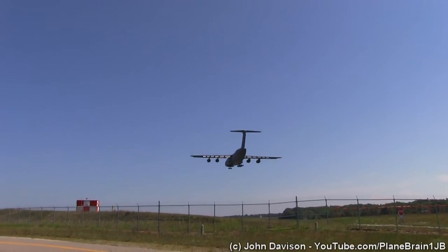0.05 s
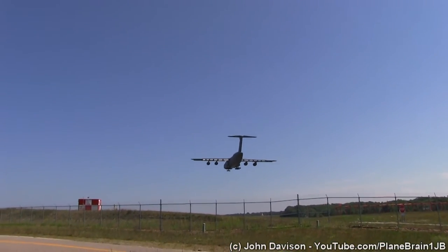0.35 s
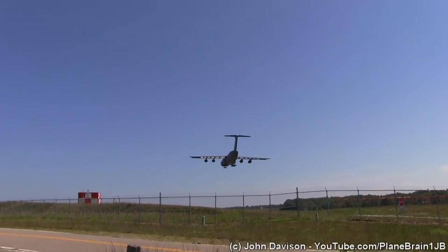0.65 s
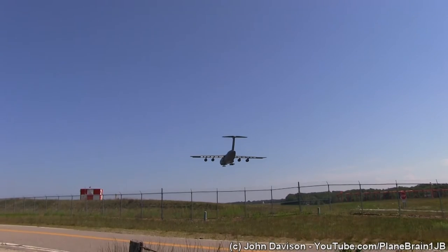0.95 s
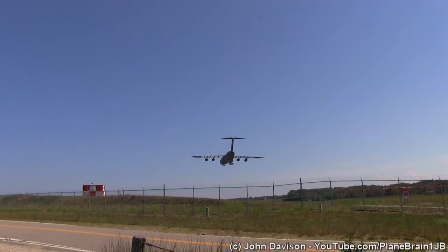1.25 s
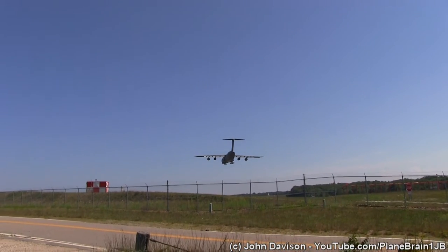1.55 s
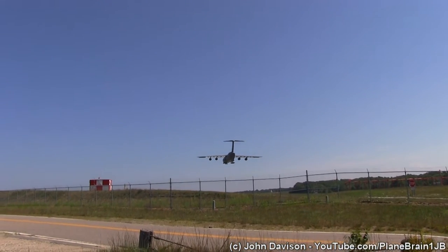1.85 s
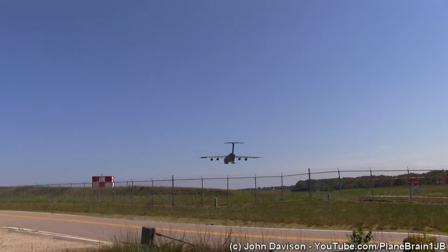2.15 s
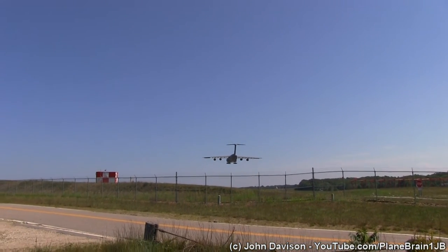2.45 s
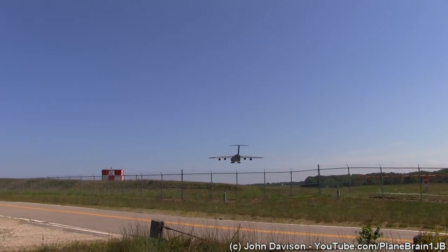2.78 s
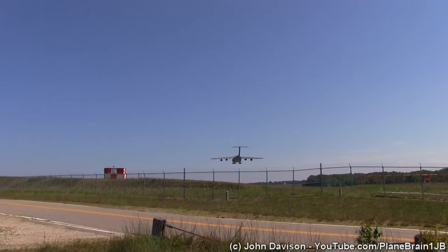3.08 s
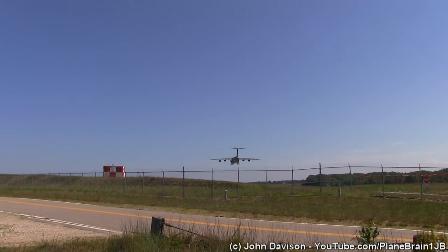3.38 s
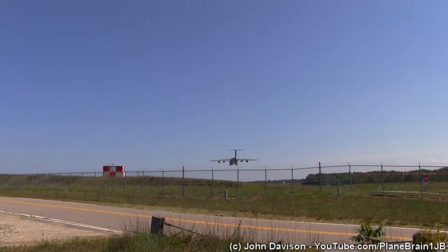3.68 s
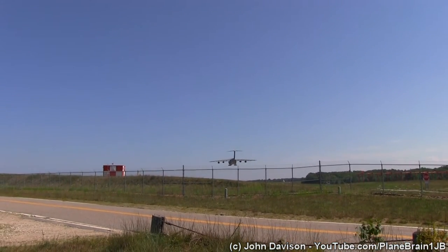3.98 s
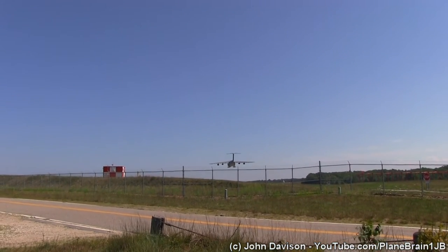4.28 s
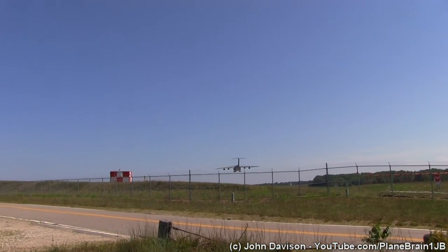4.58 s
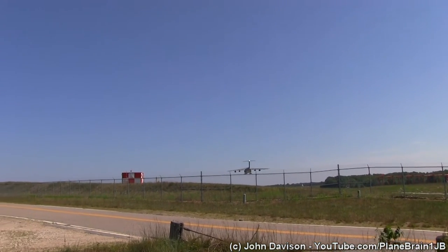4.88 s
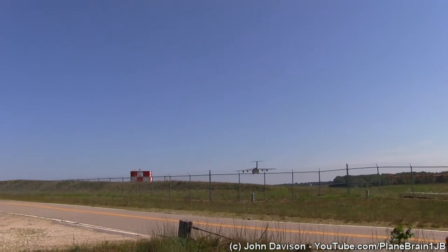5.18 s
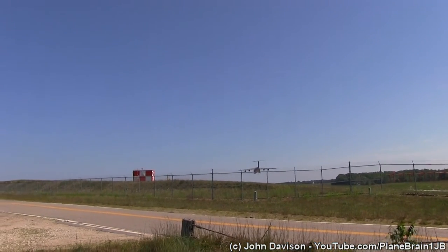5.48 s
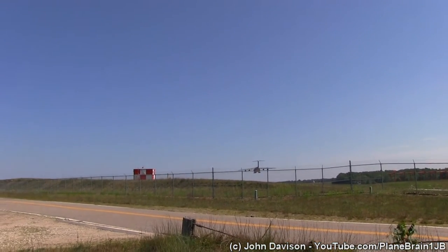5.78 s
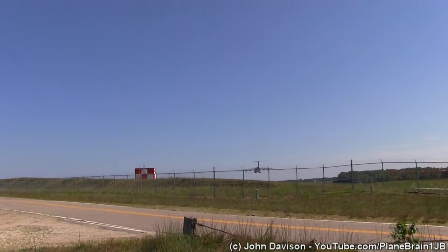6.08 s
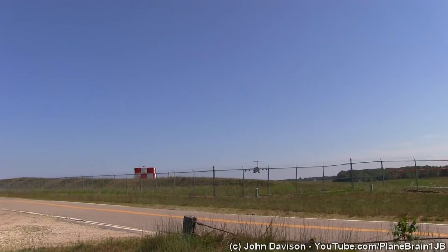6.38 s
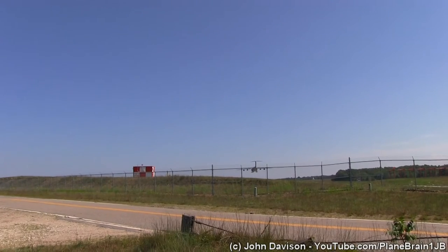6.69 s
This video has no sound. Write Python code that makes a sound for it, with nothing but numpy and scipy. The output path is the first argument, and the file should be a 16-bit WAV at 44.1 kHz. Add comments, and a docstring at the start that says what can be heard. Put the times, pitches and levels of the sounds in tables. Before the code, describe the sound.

A large four-engined jet has just passed low overhead and flies away to land. Its high fan whine wavers and sinks very slightly in pitch over a broad hiss and deep exhaust roar, all growing steadily quieter and duller. Outdoors near a runway, wind hits the microphone with low rumbles and thumps, hardest in the first second, easing off, then returning more gently in the second half.

```python
"""Near an airport runway, a four-engined jet has just passed low overhead and sinks away to land.
Its fans whine, each tone smeared into a narrow band by churning air, over fan hiss and exhaust roar.
As the distance grows, the jet gets quieter and the air takes its treble away.
Gusts of wind rumble and thump on the microphone; the first ones make a limiter turn everything down."""
import sys
import numpy as np
from scipy import signal
from scipy.fft import rfft, irfft, next_fast_len
from scipy.io import wavfile
from scipy.ndimage import uniform_filter1d

SR = 44100
rng = np.random.default_rng(int(sys.argv[2]) if len(sys.argv) > 2 else 0)


def persist_wave(psi):
    """Save psi, clipped to +-1, as 16-bit WAV."""
    counts = np.round(np.clip(psi, -1, 1) * 32767).astype(np.int16)
    wavfile.write(sys.argv[1], SR, np.atleast_2d(counts).T)


N = 306044
TIME = np.arange(N) / SR

# how often fan blades pass, as heard; the Doppler shift lowers it a little (time [s], rate [Hz])
BLADE_PITCH = [(0, 1344), (1.1, 1338), (3.4, 1323), (6.94, 1309)]
# the main whine and its upper fringe (pitch [times the blade rate], width [Hz], level [dB])
MAIN_WHINE = [(.974, 47, -6), (1.006, 67, -3.5), (1.044, 90, -10), (1.03, 313, -13)]
# the lower engine tones (pitch [times the blade rate], width [Hz], level [dB])
LOW_WHINE = [(.622, 38.4, -1.5), (.558, 36, -11)]
# the fans' overtones and side bands (pitch [times the blade rate], width [Hz], level [dB])
HIGH_WHINE = [(1.26, 210, -8.1), (1.62, 140.4, -14), (2.024, 189, -1.5), (2.04, 420, -4), (3.03, 300, -5.5),
              (3.1, 602, -9.5), (4.015, 440, -12), (5.07, 620, -15)]
# fan hiss before the air dulls it (frequency [Hz], level [dB])
HISS_SPECTRUM = [(500, -17.5), (1000, -7), (1500, .3), (1950, -2), (2900, -2), (3500, -4), (4700, -5.5),
                 (6200, -10), (8000, -13), (9300, -20), (10500, -27.5), (12500, -48.5), (15000, -68.5)]
# exhaust roar (frequency [Hz], level [dB])
ROAR_SPECTRUM = [(20, -11.5), (60, 0.5), (130, 2), (200, 0), (300, 0.6), (450, .7), (700, -0.9), (1000, -3),
                 (2000, -8), (4000, -27.5), (9000, -73)]
# the jet swells and fades (time [s], main whine [dB], overtones, hiss and roar [dB])
JET_SWELLS = [(0, -.5, -1.3), (.2, 1.2, 0.4), (.4, -1, 0), (.8, 2, .4), (1.15, .5, 1), (1.68, -0.5, 0),
              (1.82, -5, -1.1), (1.94, -0.5, -1), (2.35, -1.6, -1.3), (2.75, -1.5, 0.9), (3.0, .8, .5),
              (3.5, -.5, -0.3), (4.0, 3, 0.6), (4.16, 0, 0.7), (4.78, 0, .3), (4.9, 3, -0.1),
              (5.1, -1.5, -.4), (5.3, 0, .5), (6.25, 0, 0), (6.94, -1, -.5)]
# strength of the wind's eddies, or swirls of air (time [s], large eddies [dB], small eddies [dB])
WIND_STRENGTH = [(0, -16.5, -24), (.24, -8, -12.5), (.39, -8, -10), (.44, -14.5, -21.5), (.62, -10.5, -19),
                 (1.0, -16.5, -25.5), (1.4, -24.5, -35), (1.55, -22.5, -31.5), (1.8, -31, -42),
                 (2.2, -27, -35.5), (2.72, -26, -33.5), (2.8, -18, -25.5), (3.3, -22, -28),
                 (3.7, -18.5, -36), (3.9, -19, -26), (4.7, -18.5, -24.5), (5.04, -24, -31),
                 (5.16, -18, -25.5), (6.0, -15, -24.5), (6.28, -24, -34.5), (6.94, -28.5, -40.5)]
# the deep swell of large eddies (frequency [Hz], level [dB])
SWELL_SPECTRUM = [(2, -35.5), (10, -3), (16, 1.5), (24, 0.5), (36, -3.5), (50, -6), (70, -17.5),
                  (110, -36.5), (600, -110)]
# the flutter of small eddies (frequency [Hz], level [dB])
FLUTTER_SPECTRUM = [(10, -45), (35, -16.5), (55, -2), (80, 0.5), (100, -6), (130, -10), (180, -25.5),
                    (330, -45), (600, -62), (4000, -110)]
# the ruffle of the finest eddies (frequency [Hz], level [dB])
RUFFLE_SPECTRUM = [(30, -44.5), (100, -12), (140, 0), (180, -4), (230, -11), (330, -24), (600, -46),
                   (4000, -100)]
# single eddies that hit the microphone (time [s], level [dB], pitch [Hz])
THUMPS = [(0.129, 2, 59.6), (0.238, 0, 76), (0.317, 0.5, 66.3), (0.504, -1.5, 85), (0.615, -6.5, 30),
          (0.804, -11, 37.9), (0.87, -18, 85), (1.532, -19, 38), (2.303, -20.5, 38), (2.766, -13.5, 55),
          (3.141, -21, 110), (3.26, -20, 95), (3.858, -15.5, 67), (4.12, -15.5, 90), (4.16, -11.5, 29.9),
          (4.48, -13, 35), (4.727, -9.5, 74.5), (4.88, -6.5, 91.3), (5.267, -10.5, 45.8),
          (5.44, -17.5, 70.6), (5.697, -8, 46.3), (5.783, -11, 46), (5.926, -10, 80), (6.125, -15.5, 70),
          (6.69, -12, 25)]
# how alike the microphone's left and right openings sound (frequency [Hz], likeness [0 to 1])
STEREO_LIKENESS = [(30, .997), (200, .962), (700, .972), (1300, 0.95), (2000, .77), (2700, 0.78),
                   (4000, .73), (9000, .72)]
# how much louder the left side is (frequency [Hz], left minus right [dB])
STEREO_BALANCE = [(50, 0.5), (200, 1.1), (780, 1.7), (950, 3), (1250, .5), (1620, 5.5), (2000, 0),
                  (2380, 5), (2620, 1.4), (3000, 5.5), (4100, 6.5), (5500, 8.5), (7000, 9.5), (10000, -4.5)]
# how far the left side runs ahead (frequency [Hz], phase lead [radians])
STEREO_PHASE = [(30, 0), (180, .3), (700, .08), (1100, 0.1), (1420, 0.45), (1830, -0.3), (2150, .5),
                (2480, 0.1), (2900, .5), (3800, .2), (5300, 0), (6700, -.74), (9500, -2.5)]

SPEED_M_S, START_DISTANCE_M = 65, 132.8


def from_db(db):
    """Turn decibels into a factor to multiply by."""
    return 10 ** (np.asarray(db) / 20)


def rms_one(x):
    """Scale a signal to an average (rms) level of 1."""
    return x / np.sqrt(np.mean(x ** 2) + 1e-20)


def in_time(rows):
    """Turn each column after the time into a curve with one value a sample."""
    times, *columns = np.transpose(rows)
    return [np.interp(TIME, times, column) for column in columns]


def at_hz(rows, hz):
    """Read a table between its rows, giving every octave equal room."""
    frequencies, values = np.transpose(rows)
    return np.interp(np.log(hz), np.log(frequencies), values)


def slow_noise(edge_hz, count=1):
    """Rows of smooth random wobble, about 1 in size and mostly slower than edge_hz."""
    step, run_in = 12, 2000   # one value every 12 samples, joined by straight lines
    lowpass = signal.butter(3, edge_hz, fs=SR / step, output="sos")
    noise = rng.standard_normal((count, N // step + run_in + 2))
    slow = rms_one(signal.sosfilt(lowpass, noise)[:, run_in:])
    joined = slow[:, :-1, None] + np.diff(slow)[:, :, None] * (np.arange(step) / step)
    return joined.reshape(count, -1)[:, :N]


def evened(x, span_s):
    """Hold the level at 1 over the given span; faster flicker stays."""
    power = uniform_filter1d(np.mean(x ** 2, axis=0), int(span_s * SR))
    return x / np.sqrt(power + 1e-9)


def stereo(mid, side, hz):
    """Left and right grow less alike as the sound waves get shorter."""
    alike = at_hz(STEREO_LIKENESS, hz)
    return np.sqrt((1 + alike) / 2) * mid + np.sqrt((1 - alike) / 2) * side * [[1], [-1]]


def turbulence(spectrum):
    """Churning air makes noise: stereo, shaped by the given spectrum, at level 1."""
    size = next_fast_len(N, True)
    hz = np.maximum(np.fft.rfftfreq(size, 1 / SR), 1)
    mid, side = rng.standard_normal((2, len(hz))) + 1j * rng.standard_normal((2, len(hz)))
    shaped = from_db(at_hz(spectrum, hz)) * stereo(mid, side, hz)
    return rms_one(irfft(shaped, size)[:, :N])


def fan_whine(tones):
    """Spinning fans make tones; churning air scrambles their strength and timing into narrow bands."""
    blade_hz, = in_time(BLADE_PITCH)
    whine = np.zeros((2, N))
    for multiple, width_hz, db in tones:
        hz = multiple * blade_hz
        phase = 2 * np.pi * np.cumsum(hz) / SR
        scatter = slow_noise(width_hz / 2, count=4)
        mid, side = scatter[:2] * np.cos(phase) + scatter[2:] * np.sin(phase)
        whine += from_db(db) * stereo(mid, side, hz.mean())
    return whine


def dulled_by_air(x, pivot_hz):
    """Ever more air soaks up the treble: the sound tilts down above pivot_hz and up below it."""
    loss_db_per_m, steepness = .00114, 1.853   # loss at 1 kHz, and how fast it grows with frequency
    hz, seconds, frames = signal.stft(x, SR, nperseg=1024)
    tilt = (hz[:, None] / 1000) ** steepness - (pivot_hz / 1000) ** steepness
    loss_db = loss_db_per_m * tilt * SPEED_M_S * seconds
    return signal.istft(frames * from_db(-loss_db), SR)[1][:, :N]


def receding(start_db, fall_db):
    """Gain in dB that drops by fall_db per tenfold distance; under 20 for sound beamed backwards."""
    return start_db - fall_db * np.log10(1 + SPEED_M_S * TIME / START_DISTANCE_M)


def jet():
    """Fan whine, fan hiss and exhaust roar fade with distance; the tones waver in the moving air."""
    # the exhaust aims its low sounds in a beam that sweeps over the microphone midway
    beam = np.exp(-((TIME - 3.55) / .65) ** 2)
    waver = slow_noise(7.8, count=3)
    main_db = receding(-18.5, fall_db=14.5) + .6 * waver[0]
    low_db = receding(-38.5, fall_db=11.5) + 4.2 * beam + .8 * waver[1]
    high_db = receding(-25.5, fall_db=20) + .62 * waver[2]
    hiss_db = receding(-25.5, fall_db=20.5)
    roar_db = receding(-29, fall_db=16.8) + 1.6 * beam
    main = from_db(main_db) * evened(fan_whine(MAIN_WHINE), span_s=.13)
    low = from_db(low_db) * evened(fan_whine(LOW_WHINE), span_s=.22)
    high = from_db(high_db) * dulled_by_air(fan_whine(HIGH_WHINE), pivot_hz=2700)
    hiss = from_db(hiss_db) * dulled_by_air(turbulence(HISS_SPECTRUM), pivot_hz=3340)
    roar = from_db(roar_db) * turbulence(ROAR_SPECTRUM)
    shimmer = from_db(.45 * slow_noise(33))
    main_swell, rush_swell = from_db(in_time(JET_SWELLS))
    return shimmer * (main_swell * main + low) + rush_swell * (shimmer * high + hiss + roar)


def wind():
    """Large eddies swell slowly; smaller ones flutter and ruffle on top of them in clumps."""
    large_db, small_db = in_time(WIND_STRENGTH)
    swell_db = large_db - .2 + 1.55 * slow_noise(8)
    flutter_db = small_db - .85
    usual_small_db = -27
    ruffle_db = -38.3 + .83 * (small_db - usual_small_db)   # follows most of the small eddies' swing
    swell = from_db(swell_db) * evened(turbulence(SWELL_SPECTRUM), span_s=.12)
    flutter = from_db(flutter_db) * evened(turbulence(FLUTTER_SPECTRUM), span_s=.07)
    ruffle = from_db(ruffle_db) * evened(turbulence(RUFFLE_SPECTRUM), span_s=.083)
    clumps = from_db(2.26 * slow_noise(22) + wakes_db())
    return overloaded(swell + (flutter + ruffle) * clumps + thumps())


def thumps():
    """A single eddy pushes the microphone's thin membranes to and fro for a cycle or two."""
    track, elapsed = np.zeros(N), TIME[:SR // 4]
    for (start_s, db, hz), turn in zip(THUMPS, rng.random(len(THUMPS))):
        cycles, start = elapsed * hz, round(start_s * SR)
        age = cycles / .95   # the push is strongest at age 1
        thump = (age * np.exp(1 - age)) ** 2 * np.sin(2 * np.pi * (cycles + turn))
        track[start:start + len(thump)] += from_db(db) * thump[:N - start]
    return track


def wakes_db(boost_db=5, width_s=.035, delay_s=.02):
    """Each thumping eddy briefly stirs up smaller ones."""
    return boost_db * sum(np.exp(-((TIME - s - delay_s) / width_s) ** 2) for s, _, _ in THUMPS)


def overloaded(x, ceiling_db=3):
    """The hardest gusts overload the microphone, which rounds off their peaks."""
    return x / (1 + (x / from_db(ceiling_db)) ** 6) ** (1 / 6)


def limiter(x, limit_db=-2.5, release_db_per_s=10, attack_s=.0034):
    """A peak over the limit quickly turns the volume down; it creeps back at a steady rate."""
    peak_db = 20 * np.log10(np.abs(x).max(axis=0) + 1e-9)
    over_db = np.maximum(peak_db - limit_db, 0)
    recovery_db = release_db_per_s * TIME
    cut_db = np.maximum.accumulate(over_db + recovery_db) - recovery_db
    return x * from_db(-uniform_filter1d(cut_db, int(attack_s * SR)))


def scene():
    """The jet in the distance and the wind right at the microphone."""
    return jet() + wind()


def record(dry):
    """The camera body shades and delays each side; then come a limiter, faint hiss and a treble cut."""
    size = next_fast_len(N + SR // 2)
    hz = np.maximum(np.fft.rfftfreq(size, 1 / SR), 1)
    sides = np.array([[.5], [-.5]])
    shade = from_db(sides * at_hz(STEREO_BALANCE, hz))
    delay = np.exp(1j * sides * at_hz(STEREO_PHASE, hz))
    heard = limiter(irfft(rfft(dry, size) * shade * delay, size)[:, :N])
    amplifier_hiss = from_db(-70.5) * (rng.standard_normal(N) + .6 * rng.standard_normal((2, N)))
    treble_cut = signal.ellip(10, .1, 90, 15700, fs=SR, output="sos")   # steep, above 15700 Hz
    return signal.sosfilt(treble_cut, heard + amplifier_hiss)


dry = scene()
out = record(dry)
persist_wave(out)
```